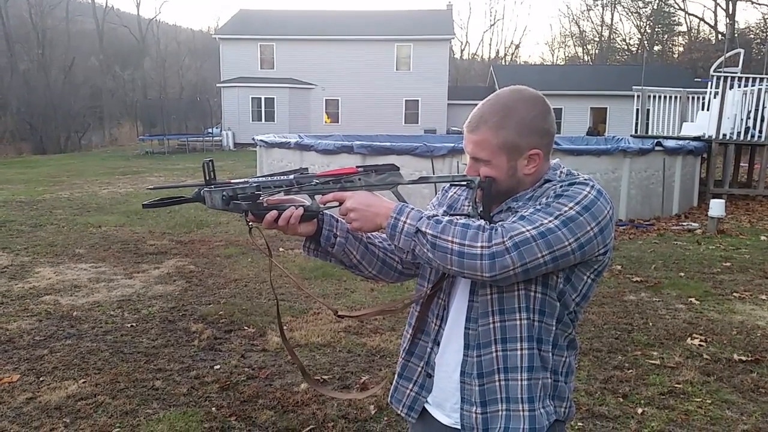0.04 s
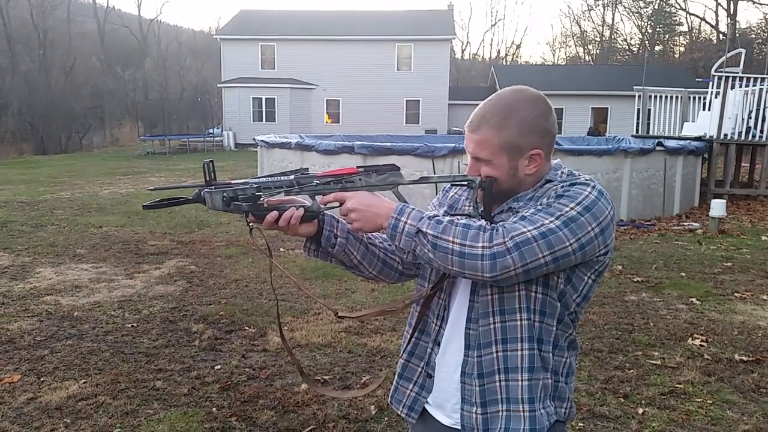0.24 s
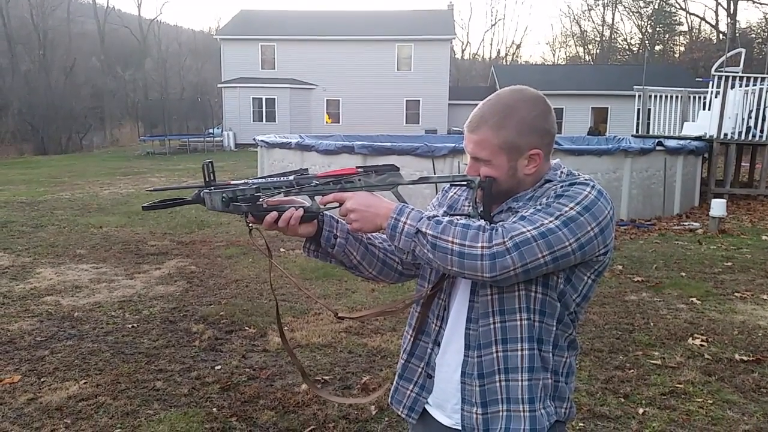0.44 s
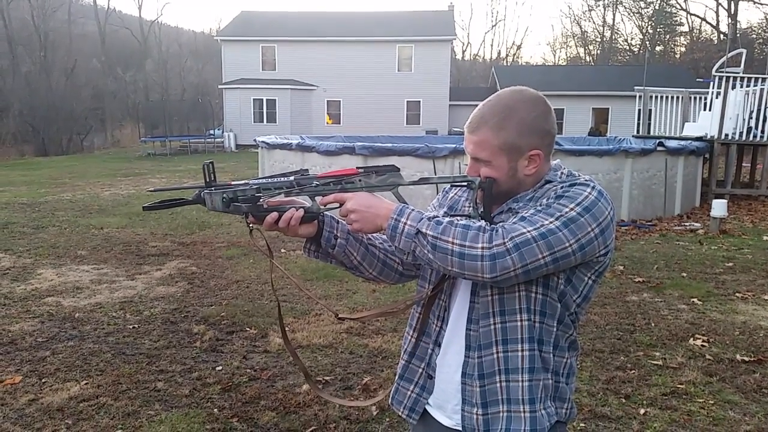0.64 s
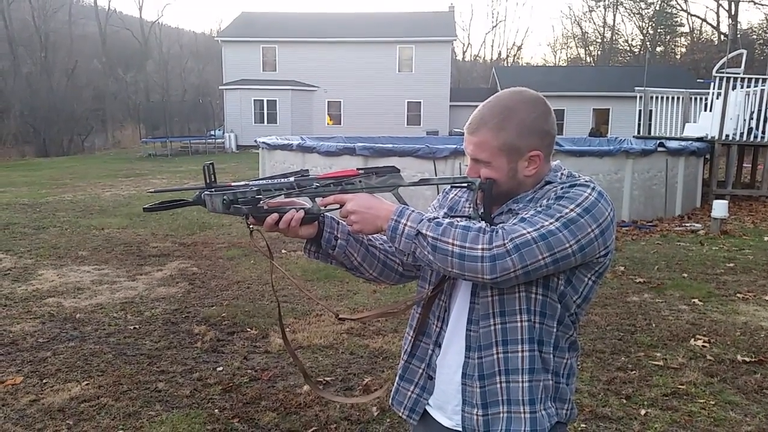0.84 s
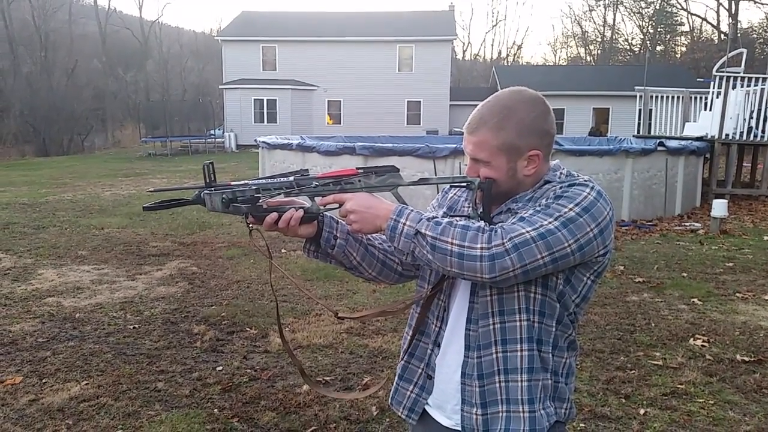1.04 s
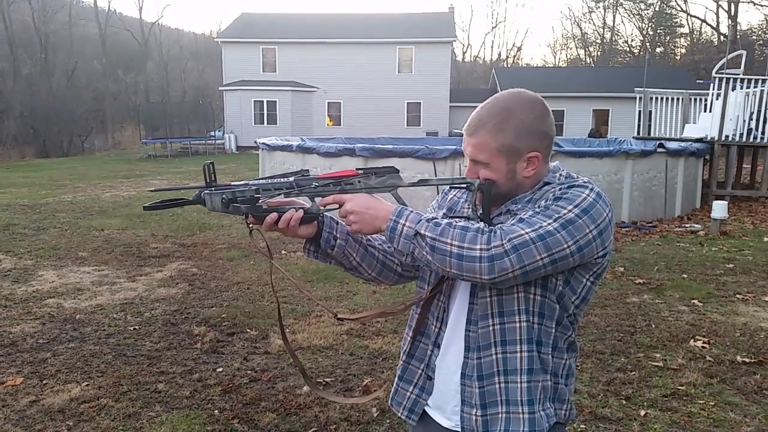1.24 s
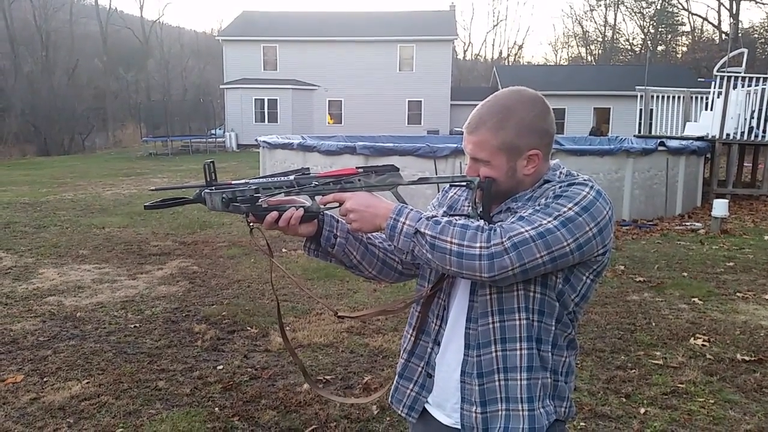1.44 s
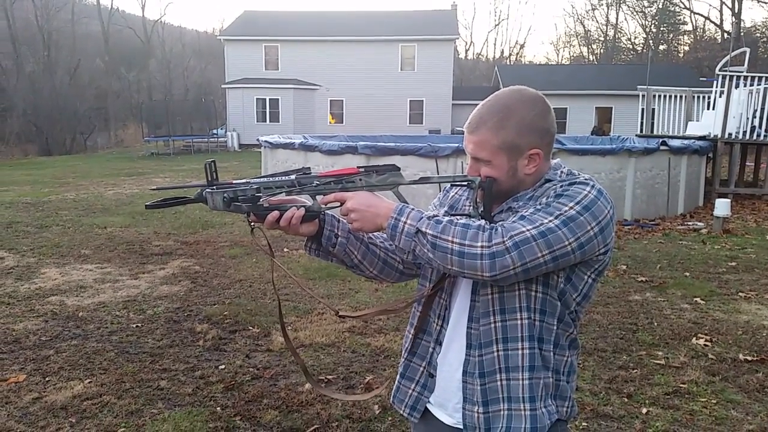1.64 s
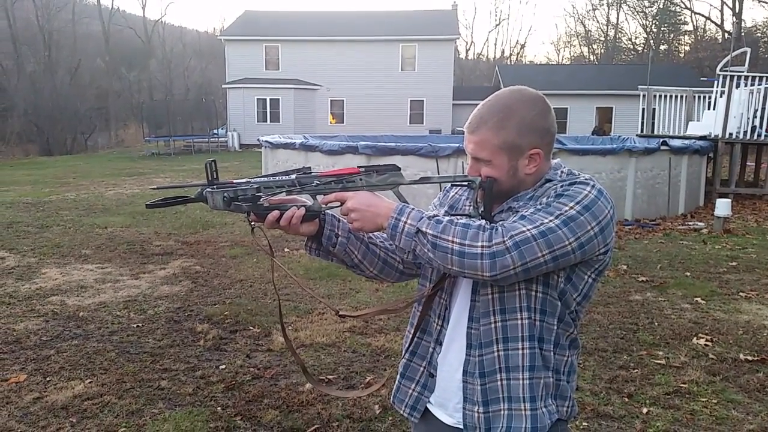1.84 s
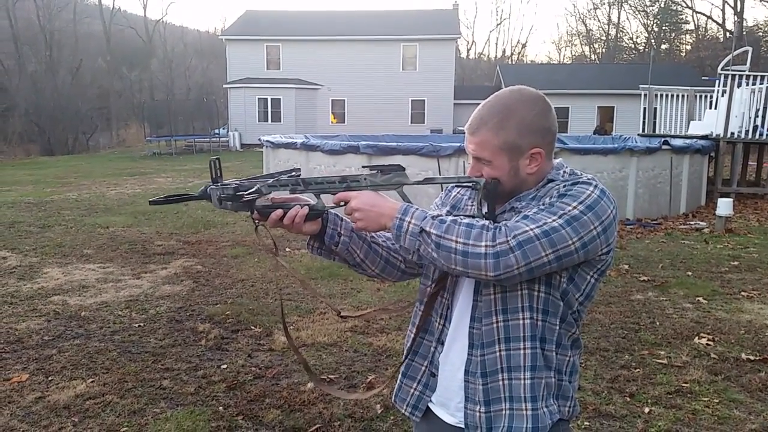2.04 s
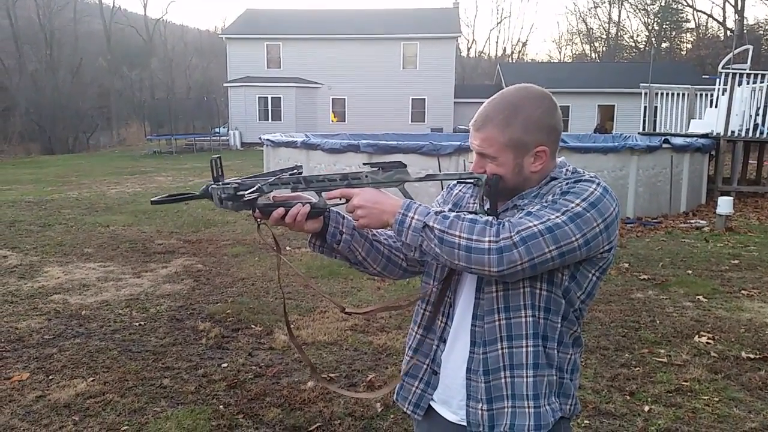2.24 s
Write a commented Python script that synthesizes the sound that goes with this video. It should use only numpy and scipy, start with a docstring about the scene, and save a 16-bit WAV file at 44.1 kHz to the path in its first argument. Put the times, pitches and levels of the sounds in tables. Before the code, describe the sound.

A crossbow fires once, close to the microphone, with a loud snap and brief rattle. Before it, quiet backyard air hisses and a distant engine throbs. Just after, the bolt lands far off with a faint thud.

```python
"""A distant engine throbs, its two close tones beating, over outdoor air, a steady hiss and a faint whistle.
About two seconds in, a crossbow fires close by in the backyard: the trigger ticks, the latch lets go,
the string slams home, and the limbs and fittings rattle in damped vibration. The bolt thuds in far off,
and the yard scatters a weak tail. The snap drives a limiter's gain down, so the background stays ducked."""
import sys
import numpy as np
from scipy import signal
from scipy.fft import rfft, irfft
from scipy.io import wavfile
from scipy.ndimage import uniform_filter1d

SR = 44100
rng = np.random.default_rng(int(sys.argv[2]) if len(sys.argv) > 2 else 0)


def materialize(psi):
    """Save the field psi as 16-bit PCM at rate SR to the path in sys.argv[1].

    A 1-D psi becomes a single channel; in a 2-D psi each row is a channel.
    """
    bounded = np.clip(np.atleast_2d(psi).T, -1, 1)
    quanta = np.round(bounded * 32767).astype(np.int16)
    wavfile.write(sys.argv[1], SR, quanta)


N = 105840

# noise spectra of air, low rumble, hiss, finer hiss and whistle: frequency_hz, relative_density_db
AIR_SPECTRUM = [(20, -24), (40, -5.5), (62, -6), (90, 0), (150, -5.5), (235, -5.5), (300, -10.5),
                (550, -18), (850, -13.5), (1400, -24.5), (2200, -39.5), (3500, -35), (6500, -57.5),
                (9000, -60.5)]
RUMBLE_SPECTRUM = [(30, -31), (50, -3.5), (62, 8), (76, -2.5), (110, -32.5), (300, -68.5), (2000, -120)]
HISS_SPECTRUM = [(2100, -38.5), (2700, -10.5), (3300, -4), (3900, 3.5), (4500, -4), (5200, -15.5),
                 (5900, -33.5), (7000, -53)]
FINE_HISS_SPECTRUM = [(6000, -21), (9800, -31), (11000, -10.5), (12300, -3.5), (13700, -2.5), (15500, 0.5)]
WHISTLE_SPECTRUM = [(6300, -40), (6900, -11), (7080, -0.5), (7300, -18), (7900, -40.5), (13600, -39),
                    (14120, 12), (14600, -29)]
# brief swells of rumble, finer hiss and whistle: peak_s, width_s, level_db
RUMBLE_SWELLS = [(.83, 0.019, -54.5), (1.98, 0.12, -52)]
FINE_HISS_SWELLS = [(.66, .19, -80), (1.46, 0.029, -81.5), (1.81, 0.027, -84)]
WHISTLE_SWELLS = [(.655, 0.033, -77), (.8, 0.036, -86)]
# impacts of trigger, latch and string, then rattles: start_s, clack_db, sizzle_db, t60_s
BOW_IMPACTS = [(2.0655, -68, -51, 0.013), (2.0825, -10.5, 1.5, 0.016), (2.0882, -18, -3, 0.01),
               (2.0916, -7, -5.5, 0.02), (2.0958, -23, -5, 0.036), (2.1007, -17, -7, 0.025),
               (2.1084, -25.5, -13.5, 0.057), (2.1182, -27.5, -4, 0.04), (2.1243, -29, -15, 0.039),
               (2.133, -39, -14, 0.037), (2.1422, -34, -15.5, 0.1), (2.149, -54, -37, 0.027),
               (2.157, -35, -15, 0.013)]
# the stock's clack, the fittings' sizzle and the string's woody smack: frequency_hz, relative_density_db
CLACK_SPECTRUM = [(90, -20), (190, 0.5), (330, 0), (620, 0), (850, 2.5), (1020, -7), (1350, 4.5),
                  (1600, -4.5), (2200, -8), (3300, -5.5), (4500, -0.5), (5400, -5.5), (6100, -28),
                  (8000, -26), (12000, -52)]
SIZZLE_SPECTRUM = [(3000, -20), (6600, -19), (7800, -28), (9200, -16), (10100, -15), (11000, -1),
                   (12800, 0.5), (14000, -3.5), (15600, 3)]
SMACK_SPECTRUM = [(100, -22.5), (185, 8), (290, -5), (400, -2.5), (520, 0), (680, -2.5), (880, -4.5),
                  (1050, -5.5), (1330, -14), (1600, -7.5), (2000, -12), (2500, -42), (7000, -59)]
# normal modes of string, limbs and metal parts: pitch_hz, relative_level_db, t60_s
BOW_MODES = [(198, -21.5, 0.1), (236.6, -25.5, 0.19), (637, -28.5, 0.1), (856, -35, 0.12),
             (1228, -42, 0.125), (1343, -26.5, 0.1), (2015, -48, .13), (3860, -49, .15), (4350, -32, 0.07),
             (5340, -54, 0.065), (6578, -54, 0.28), (12510, -35, 0.14), (13040, -21, 0.067)]
# stereo balance of the bow: frequency_hz, left_minus_right_db
BOW_BALANCE = [(200, -5.5), (700, 0), (1300, -1), (2400, 3.5), (4400, 10), (6500, 11.5), (8500, -1.5),
               (11000, -1), (13000, -9.5), (15500, 1.5)]
# the bolt lands in two knocks, then its echo returns: start_s, thud_db, tick_db, t60_s
BOLT_IMPACTS = [(2.3413, -37, -50, 0.07), (2.3469, -34.5, -52, 0.018), (2.363, -40.5, -66, 0.21)]
# the bolt's thud and tick: frequency_hz, relative_density_db
THUD_SPECTRUM = [(100, -11), (180, -2), (270, 5), (450, -7.5), (900, -29), (1750, -15), (2500, -36),
                 (4300, -25), (7500, -55)]
TICK_SPECTRUM = [(3000, -24), (6700, -12), (8500, -25), (11000, 5), (13000, -1), (15500, -4)]
# frequency response of the yard's scattering: frequency_hz, relative_gain_db
YARD_RESPONSE = [(150, 10), (450, 12.5), (1400, 2.5), (4000, 4.5), (8000, -3.5), (12000, -4.5),
                 (15500, -16)]

ATTACK_S = 0.00041  # rise time of a hard contact


def undb(db):
    """Amplitude ratio of a level in decibels."""
    return 10 ** (np.asarray(db) / 20)


def unit(x):
    """Normalisation to rms 1."""
    return x / np.sqrt(np.mean(x ** 2))


def pan(db):
    """Channel gains for a level difference, left minus right."""
    return undb(np.array([[.5], [-.5]]) * db)


def curve(points):
    """Levels interpolated over the spectrum in log frequency."""
    hz, db = np.array(points, float).T
    bin_hz = np.arange(N + 1) * SR / (2 * N)
    return np.interp(np.log(bin_hz + 1), np.log(hz), db)


def colour(x, db):
    """Minimum-phase filter: folding the cepstrum makes the gain curve causal."""
    cepstrum = irfft(np.log(undb(db)))
    cepstrum[..., 1:N] *= 2
    cepstrum[..., N + 1:] = 0
    return irfft(rfft(x, 2 * N) * np.exp(rfft(cepstrum)))[..., :N]


def shape(x, spectrum):
    """Spectral shaping that conserves the power of white noise."""
    db = curve(spectrum)
    return colour(x, db - 10 * np.log10(np.mean(undb(db) ** 2)))


def stereo_noise(correlation):
    """Partial coherence: a common noise plus a second in antiphase between left and right."""
    mid, side = rng.standard_normal((2, N))
    return np.sqrt((1 + correlation) / 2) * mid + np.sqrt((1 - correlation) / 2) * side * [[1], [-1]]


def wander(rate_hz):
    """Slow fluctuation of rms 1, from twice-smoothed random steps."""
    hold = int(SR / rate_hz)
    steps = np.repeat(rng.standard_normal(N // hold + 1), hold)
    return unit(uniform_filter1d(uniform_filter1d(steps, hold), hold)[:N])


def swells(t, table):
    """A sum of Gaussian rises and falls in amplitude."""
    return sum(undb(db) * np.exp(-.5 * ((t - peak) / width) ** 2) for peak, width, db in table)


def strike(t, start, attack, t60):
    """Damped response: a linear rise, then exponential decay by 60 dB in t60 seconds."""
    rise = np.clip((t - start) / attack, 0, 1)
    return rise * np.exp(-np.log(1000) * np.maximum(t - start - attack, 0) / t60)


def engine(t, pitch_hz=106.7, beat_hz=6.93, crest_s=1.378, left_lead_s=.0005):
    """Beating: two close tones of a distant engine throb at their difference frequency."""
    drift = np.cumsum(0.38 * wander(rate_hz=3.48)) / SR
    cycles = pitch_hz * (t + np.array([[left_lead_s], [0]])) + drift
    lower = np.sin(2 * np.pi * cycles)
    upper = undb(-6.5) * np.sin(2 * np.pi * (cycles + beat_hz * (t - crest_s)))
    level_db = -46 + 0.5 * wander(rate_hz=9.06)
    return unit(lower + upper) * undb(level_db) * pan(-4.5)


def outdoor_air(t, coherent_below_hz=150, right_lag_s=.0005):
    """Far air and rumble are coherent in the bass and reach the left side first."""
    noise = stereo_noise(0.59)
    mid = noise.mean(axis=0)
    side = signal.sosfilt(signal.butter(1, coherent_below_hz, "high", fs=SR, output="sos"), noise - mid)
    air = shape(mid + side, AIR_SPECTRUM) * undb(-52 + .5 * wander(rate_hz=3.6))
    rumble = shape(rng.standard_normal(N), RUMBLE_SPECTRUM) * swells(t, RUMBLE_SWELLS)
    left, right = air + rumble
    return np.array([left, np.interp(t - right_lag_s, t, right)]) * pan(-1.5)


def hiss(t):
    """Band-limited noise: a steady hiss on the left, and a finer one above it that swells."""
    steady = shape(stereo_noise(0.61), HISS_SPECTRUM) * undb(-63) * pan(26)
    fine = shape(stereo_noise(0.21), FINE_HISS_SPECTRUM)
    return steady + fine * (undb(-73.5) + swells(t, FINE_HISS_SWELLS))


def whistle(t):
    """Narrow-band noise has pitch: two bands an octave apart whistle faintly on the left."""
    return shape(stereo_noise(0.69), WHISTLE_SPECTRUM) * swells(t, WHISTLE_SWELLS) * pan(20)


def crossbow(t, slap_s=2.0885, build_s=.002):
    """Impact excitation: blows sound the stock and fittings; the string's slap rings the normal modes."""
    clack_envelope = sizzle_envelope = ring = 0
    for start, clack_db, sizzle_db, t60 in BOW_IMPACTS:
        decay = strike(t, start, ATTACK_S, t60)
        first_contact = undb(-17.5) * strike(t, start, ATTACK_S, t60=0.0044)
        clack_envelope += undb(clack_db) * (decay + first_contact)
        sizzle_envelope += undb(sizzle_db) * decay
    for hz, db, t60 in BOW_MODES:
        ring += undb(db) * strike(t, slap_s, build_s, t60) * np.sin(2 * np.pi * (hz * t + rng.random()))
    smack_envelope = undb(-15) * strike(t, slap_s, build_s, t60=0.08)
    smack = shape(smack_envelope * stereo_noise(0.48), SMACK_SPECTRUM)
    clack = shape(clack_envelope * stereo_noise(0.48), CLACK_SPECTRUM)
    sizzle = shape(sizzle_envelope * stereo_noise(0.18), SIZZLE_SPECTRUM)
    balance_db = np.array([[.5], [-.5]]) * curve(BOW_BALANCE)
    return colour(smack + clack + sizzle + undb(6) * ring, balance_db)


def bolt(t):
    """Damped impacts: the far bolt lands in two knocks and an echo follows, each a dull thud with a faint tick."""
    thud = sum(undb(db) * strike(t, start, 0.0017, t60) for start, db, _, t60 in BOLT_IMPACTS)
    tick = sum(undb(db) * strike(t, start, ATTACK_S, t60) for start, _, db, t60 in BOLT_IMPACTS)
    return (shape(thud * stereo_noise(0.34), THUD_SPECTRUM)
            + shape(tick * stereo_noise(0.28), TICK_SPECTRUM))


def yard(t, sound, gain_db=-22.5):
    """Reverberation: ground, walls and trees scatter the sound into a weak, diffuse tail."""
    tail = stereo_noise(0.1) * strike(t, 0, attack=0.011, t60=0.53)
    impulse_response = colour(unit(tail) / np.sqrt(N), curve(YARD_RESPONSE) + gain_db)
    return signal.fftconvolve(sound, impulse_response, axes=1)[:, :N]


def scene():
    """Superposition: the shot and its reverberation add to the continuous background."""
    t = np.arange(N) / SR
    shot = crossbow(t) + bolt(t)
    return shot + yard(t, shot) + engine(t) + hiss(t) + outdoor_air(t) + whistle(t)


def record(dry, limit_db=-19, sense_s=0.0036, release_s=0.83, look_ahead_s=0.036):
    """Limiting: gain falls ahead of a peak and recovers slowly; a fade-out and steep low-pass follow."""
    t = np.arange(N) / SR
    power = uniform_filter1d(np.mean(dry ** 2, axis=0), int(sense_s * SR))
    release = np.exp(-t / release_s)
    held_rms = np.maximum.accumulate(np.sqrt(np.abs(power)) / release) * release
    gain = undb(limit_db) / np.maximum(held_rms, undb(limit_db))
    smooth_gain = uniform_filter1d(gain, int(look_ahead_s * SR))
    early_gain = np.interp(t + look_ahead_s / 2, t, smooth_gain)
    fade_s, cutoff_hz = 0.045, 15750
    fade = np.sqrt(np.clip((N / SR - t) / fade_s, 0, 1))
    low_pass = signal.ellip(12, .2, 80, cutoff_hz, fs=SR, output="sos")
    return signal.sosfilt(low_pass, dry * early_gain * fade)


dry = scene()
out = record(dry)
materialize(out)
```